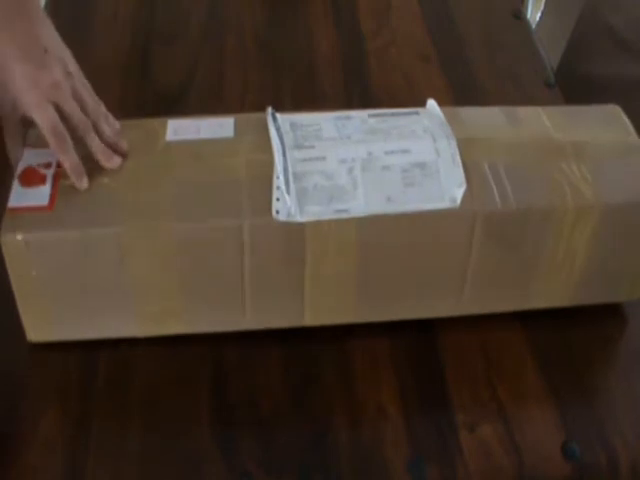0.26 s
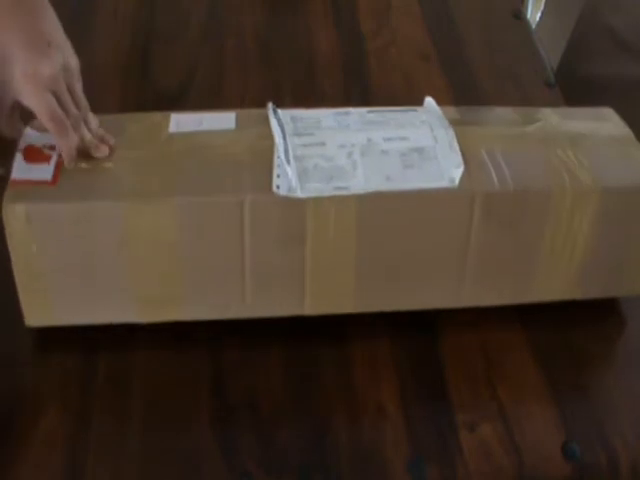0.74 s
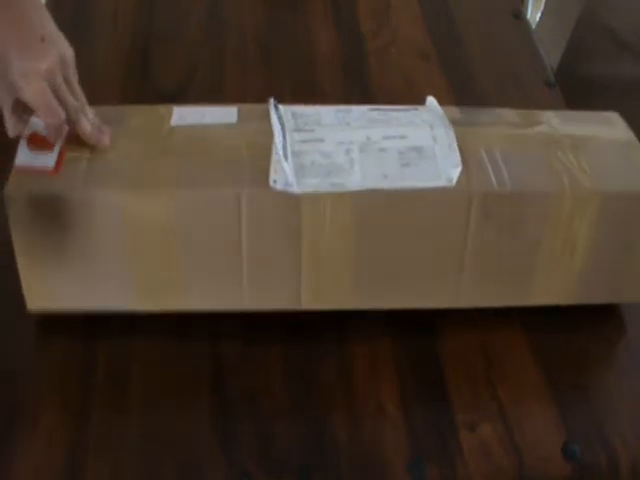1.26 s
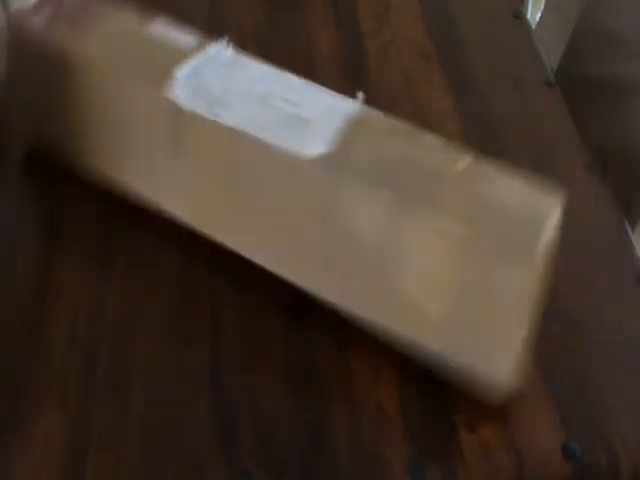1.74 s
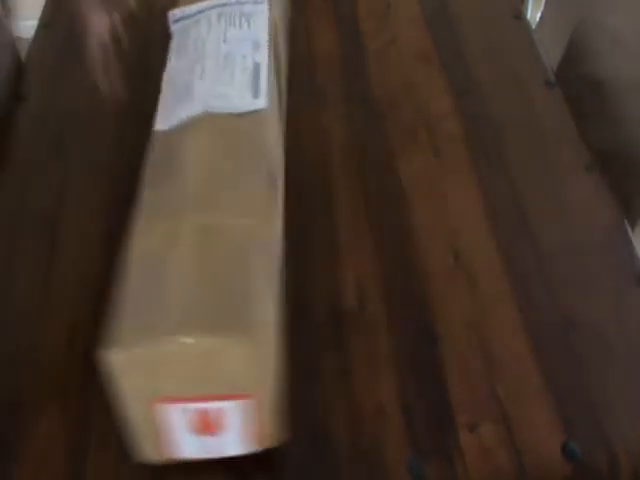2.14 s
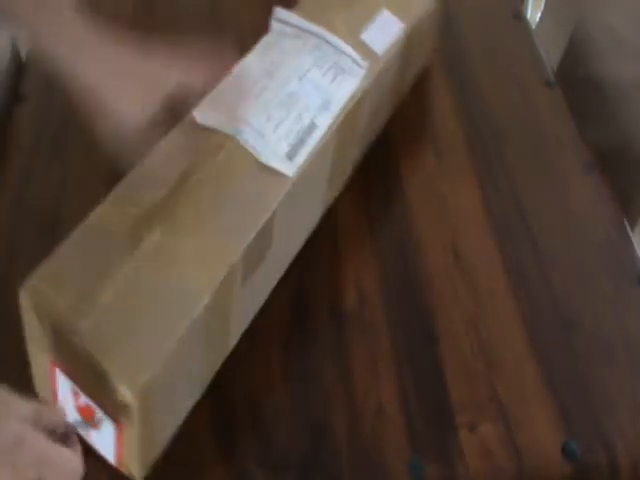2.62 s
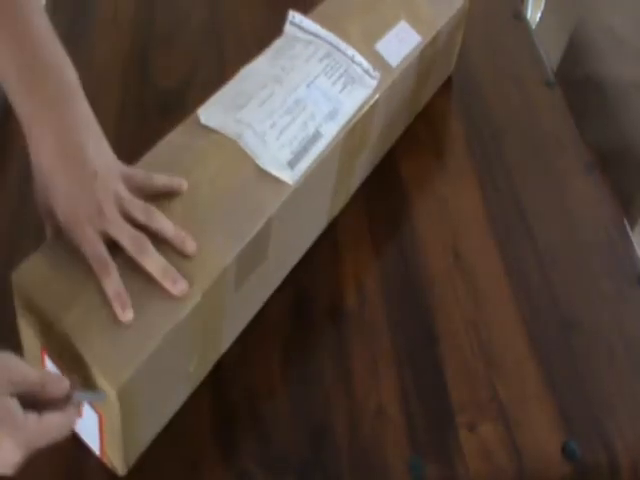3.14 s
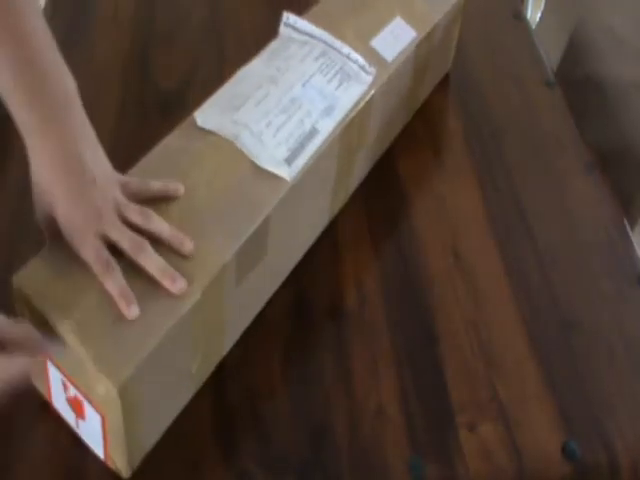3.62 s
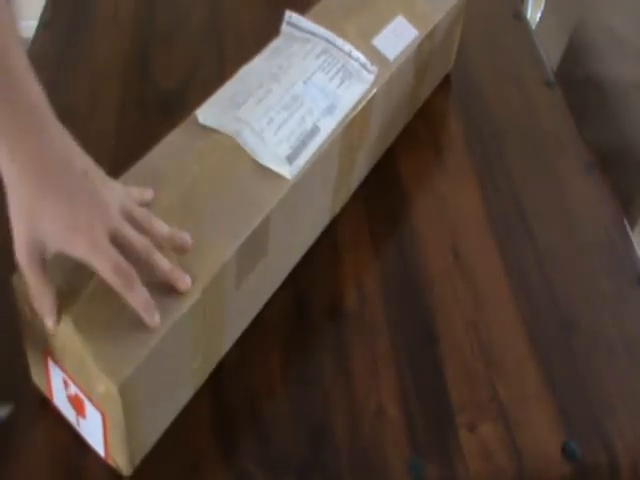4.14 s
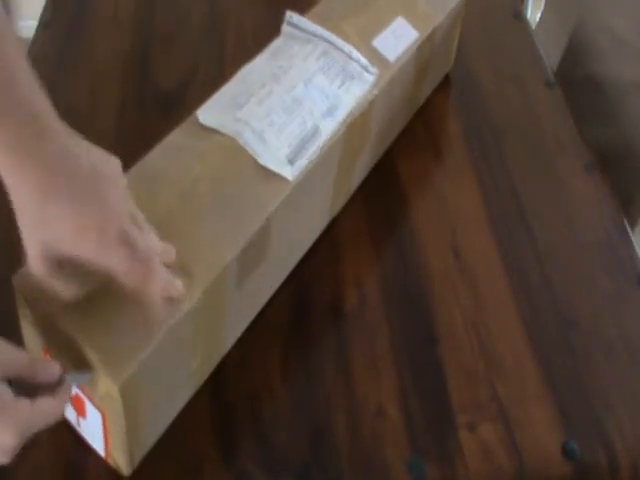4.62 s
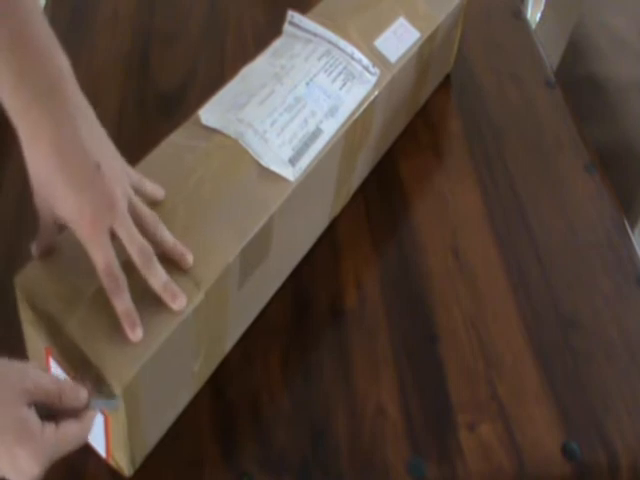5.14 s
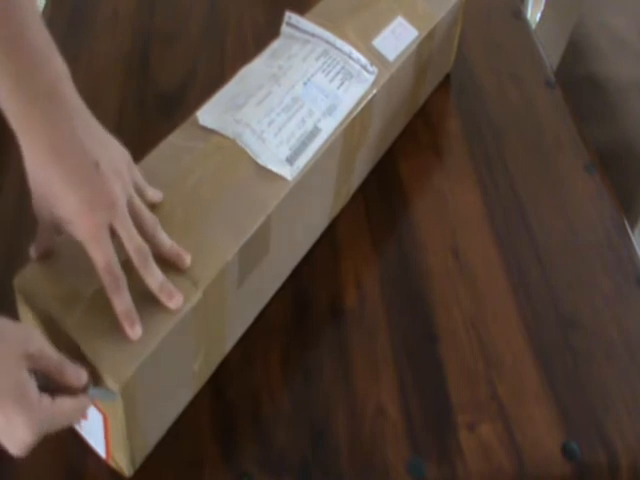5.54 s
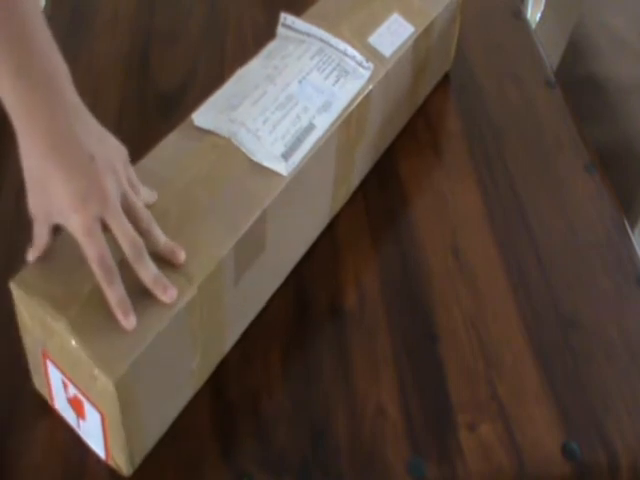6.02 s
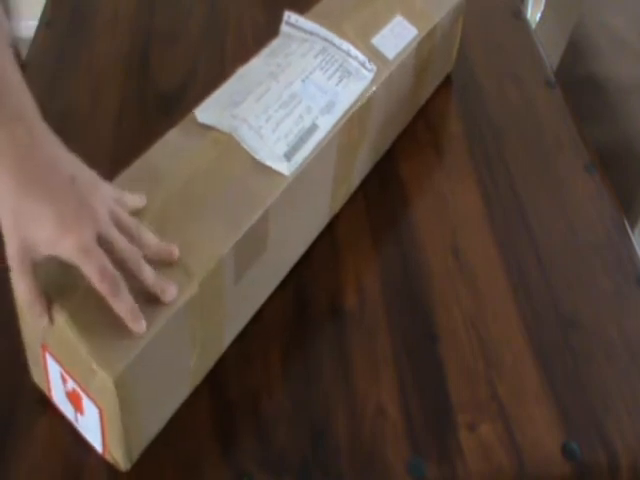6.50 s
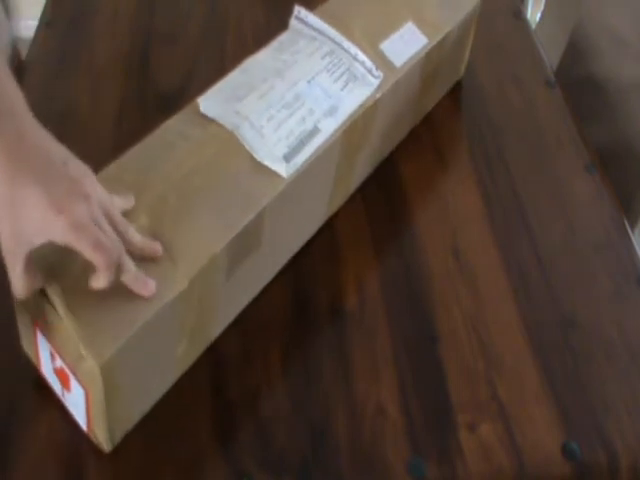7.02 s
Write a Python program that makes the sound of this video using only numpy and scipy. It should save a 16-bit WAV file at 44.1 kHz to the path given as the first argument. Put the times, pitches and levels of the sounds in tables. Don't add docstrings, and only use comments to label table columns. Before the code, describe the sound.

Close stereo sound from a small microphone in a small, hard, slightly echoing room, over steady low rumble, a distant engine, soft hiss and very faint whines. From 0 to 1 s fingers rub and pick at packing tape: a light initial thump, crisp bright crackles, a papery swipe near 0.8. At 1.03-1.2 s a blade rips tape loudly and briefly, with hollow cardboard booms. From 1.5 to 2.4 s the box slides and turns, with snaps and strong hollow knocks near 1.7 and 2.27; a loud short paper swipe lands at 2.43, a softer one at 2.7. Quiet rubbing and tiny ticks lead to a raspy double-surge rip at 3.53-3.8 s. Soft grip rustles follow, with sharp snaps near 4.3 and 4.4 and dull taps around 4.6. A third crackling rip runs 5.73-6.05, ending in a knock and thin buzz. Faint rustling continues until a firm hollow knock at 7.0 s, then fades.

```python
import sys
import numpy as np
from scipy import signal
from scipy.fft import rfft, irfft, next_fast_len
from scipy.io import wavfile
from scipy.ndimage import map_coordinates

SR = 44100
rng = np.random.default_rng(int(sys.argv[2]) if len(sys.argv) > 2 else 0)


def int16_out(signal):
    q = np.round(np.clip(np.atleast_2d(signal).T, -1, 1) * 32767)
    wavfile.write(sys.argv[1], SR, q.astype(np.int16))


def elevation(decibels):
    levels = np.asarray(decibels, float)
    return 10 ** (levels / 20)


N = 320166

# start_s, hiss_db, boom_db
STROKES = [
    [(1.02, -48, -44), (1.03, -28, -37), (1.05, -35, -34), (1.056, -22, -32), (1.102, -27.5, -22.5),
     (1.164, -24, -29), (1.21, -38, -57)],
    [(3.53, -55, -46), (3.542, -24.5, -39), (3.6, -26.5, -33), (3.692, -23.5, -24.5), (3.734, -21, -22.5),
     (3.8, -33, -45)],
    [(5.728, -79, -65), (5.736, -25, -29), (5.784, -35, -37), (5.854, -22, -29.5), (5.984, -28, -30),
     (6.008, -27, -33), (6.05, -46, -36)],
]
# hiss_hz, rasp_re_hiss_db, first_boom_hz, last_boom_hz, drone_re_boom_db
SEAMS = [
    (7300, -5.5, 290, 220, -12),
    (5360, -4, 660, 206, 0.5),
    (5000, -4, 790, 370, 6),
]
# pitch_hz, level_db (per Hz)
RIP_COLOUR = [(1470, -33), (2500, -3.5), (4780, -5), (5820, -6), (10600, -6), (15100, -13.5), (16100, -22),
              (16500, -38)]
# pitch_hz, level_db (per Hz)
RUB_COLOUR = [(1470, -31), (2500, -5), (3460, -8), (7430, -9), (10900, -8), (15200, -16), (16100, -17),
              (16500, -39)]
# pitch_hz, width_hz, level_db
RASP = [(830, 590, 13), (1046, 153, 13.5), (1420, 286, 8.5), (1875, 140, 9.5), (2190, 155, 8),
        (2500, 290, 2)]
# pitch_hz, level_db, t60_s
BOX = [(128, 0, 0.087), (135, -11, 0.058), (150, 0, 0.014), (193, -1.5, 0.29), (214.3, 0.5, 0.16),
       (248, 4.5, 0.054), (298, -1.5, 0.15), (339.5, -1.5, 0.13), (400, 4, 0.035), (460, 7, 0.071),
       (524, 10, 0.012), (602, 5.5, 0.039), (685, 9, 0.074), (812, 9.5, 0.043), (875, -62, 0.049),
       (1128, 17, 0.008)]
# peak_s, swell_s, fade_s, hiss_db, boom_db
RUBS = [(.02, 0.1, 0.25, -42.5, -41.5), (.32, 0.077, 0.27, -46.5, -45.5), (.48, 0.02, 0.35, -41.5, -45),
        (.74, 0.023, .03, -47, -62), (1.0, 0.063, 0.036, -43, -59), (1.22, .01, 0.12, -42, -50),
        (1.31, 0.2, 0.15, -44.5, -50), (1.53, 0.038, 0.96, -35, -51), (1.734, .15, 0.28, -31, -29),
        (1.85, 0.26, 0.4, -36, -54), (2.01, 0.089, 0.31, -38, -37.5), (2.22, 0.26, 0.04, -61.5, -46),
        (2.28, 0.026, 0.2, -36, -39), (2.55, 0.44, 0.05, -38.5, -42.5), (2.65, 0.15, 0.2, -39.5, -50),
        (2.91, 0.11, 0.034, -59, -48.5), (3.2, 0.26, 0.17, -80, -69), (3.5, 0.022, 0.0055, -44.5, -57)]
# peak_s, swell_s, fade_s, hiss_db, boom_db
GRIPS = [(3.92, 0.25, 0.15, -46.5, -48), (4.14, 0.027, 0.24, -52.5, -48), (4.3, 0.034, 0.12, -51, -41.5),
         (4.56, 0.057, 0.056, -39.5, -52), (4.69, 0.088, 0.072, -45.5, -45), (4.95, 0.12, 0.046, -52, -50),
         (6.17, 0.15, 0.14, -52.5, -48), (6.4, 0.08, 0.17, -54, -58), (6.585, 0.067, .09, -45, -40),
         (6.89, 0.035, 0.24, -50.5, -59), (4.81, .02, 0.074, -52, -65), (6.82, 0.19, 0.98, -58, -55),
         (7.014, 0.012, 0.048, -31.5, -47), (7.1, 0.12, 0.055, -69, -35)]
# peak_s, swell_s, fade_s, hiss_db, boom_db
SWIPES = [
    (.83, 0.064, 0.15, -34.5, -66),
    (2.433, 0.054, 0.036, -25, -40),
    (2.68, 0.041, 0.03, -38.5, -56),
]
# rasp_re_hiss_db, hiss_hz, boom_hz, drone_re_boom_db, lift_around_hiss_db
TAPE_SURFACE = (-4, 6100, 281, -3.5, 3.5)
CARD_SURFACE = (0.5, 4400, 341, -29, 5)
LABEL_SURFACE = (-11.5, 5010, 331, -21, 8)
# start_s, peak_db, lowest_hz, highest_hz
TAPE_SNAPS = [(0.0323, -31, 1600, 11500), (0.1058, -15, 4400, 14700), (0.1228, -21, 5500, 14700),
              (0.1598, -29, 5500, 14700), (0.2573, -26, 4400, 14700), (0.2652, -13, 4400, 14700),
              (0.2985, -26, 2700, 14700), (0.3113, -25, 3400, 11500), (0.352, -27, 5500, 14700),
              (0.36, -28, 7100, 14700), (0.3892, -23, 1300, 14700), (0.4073, -28, 7100, 14700),
              (0.4765, -12, 4000, 9000), (0.4959, -17, 4800, 9000), (0.5232, -15, 7100, 14700),
              (0.599, -30, 2100, 14700), (0.6137, -24, 5500, 11500), (0.7272, -38, 1600, 7100),
              (0.7393, -33, 2700, 11500), (0.758, -34, 7100, 11500), (0.7921, -15, 3000, 17000),
              (0.822, -24, 2700, 11500), (0.9769, -21, 3400, 14700), (1.0291, -20, 7100, 14700),
              (1.0336, -15, 4400, 14700), (1.0457, -16, 7100, 14700), (1.0568, -10, 800, 11500),
              (1.0895, -6, 4400, 14700), (1.0947, -11, 3400, 14700), (1.1656, -14, 800, 11500),
              (1.1709, -15, 3400, 14700), (1.1785, -16, 5500, 11500), (1.3294, -25, 5500, 11500),
              (1.6821, -17, 2700, 14700), (1.7411, -14, 1500, 9000), (1.8266, -13, 4400, 11500),
              (1.8443, -14, 5500, 11500), (2.9182, -33, 2100, 14700), (2.9642, -37, 2100, 14700),
              (3.1404, -35, 4400, 11500), (3.172, -34, 3400, 11500), (3.1927, -29, 4400, 9000),
              (3.4258, -29, 3400, 11500),
              (3.5006, -13, 5500, 11500), (3.5463, -8, 800, 9000), (3.5555, -14, 2500, 9000),
         (3.5802, -11, 4400, 11500), (3.764, -10, 1500, 14700), (3.771, -16, 1500, 7000),
         (3.9852, -30, 800, 1700), (4.139, -32, 1600, 4400), (4.2116, -36, 1300, 14700),
         (4.2885, -14, 2100, 14700), (4.4305, -11, 2300, 14700), (4.5463, -28, 800, 14700),
         (4.6231, -27, 4400, 11500), (4.6719, -30, 1600, 7100), (4.6996, -33, 800, 5600),
         (4.7935, -40, 2700, 11500), (4.8003, -35, 3400, 11500), (4.8176, -39, 5500, 11500),
         (4.9166, -33, 3400, 9000), (5.0256, -38, 9000, 17000), (5.5893, -36, 7100, 17000),
         (5.7045, -17, 4400, 14700), (5.736, -15, 800, 14700), (5.7709, -7, 4400, 14700),
         (5.792, -16, 2100, 14700), (5.8317, -12, 1300, 11500), (5.8416, -10, 7100, 11500),
         (5.8454, -7, 800, 11500), (6.012, -9, 1700, 11500), (6.0207, -15, 1900, 7100),
         (6.0325, -17, 2700, 7100), (6.1749, -33, 3400, 11500), (6.2398, -27, 5500, 14700),
         (6.3593, -32, 2700, 14700), (6.3932, -30, 800, 2700), (6.4451, -37, 2100, 11500),
         (6.4531, -39, 800, 7100), (6.5673, -32, 800, 7100), (6.5834, -26, 800, 9000),
         (6.646, -36, 800, 9000), (6.6776, -35, 800, 5600), (6.8096, -40, 800, 11500),
         (6.8759, -38, 2700, 11500), (7.0007, -29, 1000, 7100), (7.0138, -15, 700, 9000),
         (7.2476, -29, 7100, 14700)]
# start_s, peak_db, centre_hz, spread_octaves
KNOCKS = [(.032, -18, 190, 0.93), (0.977, -31, 370, 0.37), (1.055, -15, 485, 0.78), (1.09, -9.5, 205, 0.3),
          (1.164, -10, 255, 0.78), (1.96, -20.5, 135, 0.21), (1.567, -23, 177, 0.63),
          (1.704, -7.5, 322, 0.3), (1.74, -8.5, 304, 0.58), (2.2651, -6, 332, 0.32),
          (2.287, -13, 400, 0.37), (2.323, -16.5, 290, 0.4), (2.363, -27, 292, 0.26),
          (1.117, -13, 202, 0.22), (1.139, -11, 210, .2), (1.682, -23, 400, 0.38), (2.151, -33, 388, 0.12),
          (6.568, -34, 400, 0.77), (3.546, -23.5, 657, 0.22), (3.985, -30, 615, 0.42),
          (4.287, -30, 460, 0.095), (4.425, -29, 590, 0.29), (4.546, -24, 196, 0.7),
          (4.649, -22.5, 314, 1.1), (4.699, -23, 308, 0.96), (5.845, -24, 612, 0.065),
          (6.011, -12.5, 329, 0.82), (6.393, -32, 520, 0.7), (6.586, -20, 290, 0.35),
          (7.0132, -6.5, 343, 0.15), (4.562, -29, 696, .8), (3.585, -20, 604, .4), (5.735, -20, 690, 0.64),
          (4.301, -26.5, 442, 0.1), (1.76, -16.5, 260, 0.26), (7.0135, -19.5, 750, 0.35)]
# start_s, level_db (rms), pitch_hz, t60_s
TWANGS = [
    (5.74, -32, 2350, 0.12),
    (6.012, -34.5, 2450, 0.38),
    (6.021, -37, 3030, 0.23),
    (6.675, -43.5, 2980, 0.03),
    (6.675, -42, 4630, 0.028),
    (3.18, -48, 4950, 0.14),
]
# start_s, peak_db
BUMPS = [
    (0.03, -27),
    (1.564, -30),
    (1.702, -18.5),
    (2.264, -22),
    (3.699, -39),
    (4.545, -49),
    (4.655, -33),
]
# start_s, peak_db
THUDS = [
    (2.272, -21),
    (1.706, -31),
    (.04, -32),
]
# delay_s, level_db, smear_s
ECHOES = [(.008, -6.5, .0001), (.0172, -14, .0008), (.0198, -12, .001), (.036, -18, .001)]
# pitch_hz, t60_s
ROOM_T60 = [(200, 0.58), (1400, 0.48), (5000, 0.46), (14000, 0.33)]
# pitch_hz, likeness (0 to 1)
LIKENESS = [(60, 1.0), (130, 1), (290, 0.98), (640, 0.85), (1410, 0.31), (3100, 0.52), (6820, 0.59),
            (15000, 0.73)]
# pitch_hz, lead_rad
LEAD = [(30, 1.1), (150, 1.05), (430, .85), (1810, .4), (3700, .25), (8700, .3), (12500, .75), (16500, .5)]
# pitch_hz, level_db
BALANCE = [(60, -1.5), (240, 0), (950, -0.5), (3770, 0.5), (15000, 1.5)]
# pitch_hz, level_db
RUMBLE = [(15, -39), (33, -15), (45, 3), (53, -14), (85, -8), (172, -2.5), (202, -9.5), (339, -3.5),
          (368, -8.5), (952, -14.5), (1030, -16), (1880, -23.5), (2600, -23.5), (3410, -30.5),
          (15200, -38.5), (16500, -44)]
# pitch_hz, level_db (rms)
WHINE = [(2521, -66.5), (3150, -87), (15620, -73)]


def rms_one(x):
    return x / np.sqrt(np.mean(x ** 2) + 1e-20)


def at_hz(points, hz):
    table = np.array(points)
    return np.interp(np.log(hz), np.log(table[:, 0]), table[:, 1])


def near(hz, centre_hz, octaves):
    return np.exp(-.5 * (np.log2(hz / centre_hz) / octaves) ** 2)


def band(x, low_hz, high_hz):
    edges = [low_hz, min(high_hz, .45 * SR)]
    return signal.sosfilt(signal.butter(2, edges, "band", fs=SR, output="sos"), x)


def drift(rate_hz):
    r = np.exp(-32 * np.pi * rate_hz / SR)
    noise = rng.standard_normal(N // 16 + 2002)
    slow = signal.lfilter([1], [1, -2 * r, r * r], noise)[2000:]
    return np.interp(np.arange(N) / 16, np.arange(len(slow)), rms_one(slow))


def ring(x, hz, t60):
    r, w = elevation(-60 / (t60 * SR)), 2 * np.pi * hz / SR
    return signal.lfilter([0, np.sin(w)], [1, -2 * r * np.cos(w), r * r], x + 1e-18)


def blade():
    t, out = np.arange(N) / SR, np.zeros((8, N))
    out[5:] = 1
    for rows, (hiss_hz, rasp_db, first_hz, last_hz, drone_db) in zip(STROKES, SEAMS):
        s, speed_db, press_db = np.transpose(rows)
        done = np.clip((t - s[0]) / (s[-1] - s[0]), 0, 1)
        touch = np.clip(np.minimum(t - s[0], s[-1] - t) / .004 + 1, 0, 1)
        hiss_db = np.interp(t, s, speed_db)
        boom_db = np.interp(t, s, press_db)
        panel_db = boom_db + drone_db + 7.5 * (done - .5)
        boom_hz = first_hz * (last_hz / first_hz) ** done
        controls = [touch, hiss_db, rasp_db, boom_db, panel_db, hiss_hz, boom_hz, 4.0]
        for row, value in zip(out, controls):
            row[:] = np.where(touch > 0, value, row)
    return out


def friction(controls, colour, per_s, spread_db, lumpy_db):
    touch, hiss_db, rasp_db, boom_db, drone_db, hiss_hz, boom_hz, focus_db = controls
    sizes = elevation(spread_db * np.minimum(rng.exponential(1, N), 5)) * rng.choice([-1, 1], N)
    chance = per_s * elevation(lumpy_db * drift(60)) / SR
    slips = rms_one(sizes * (rng.random(N) < chance))

    edges = 2500 * 2 ** np.arange(0, 3, 1 / 3)
    hiss, power = 0, 0
    dealt = rng.integers(0, 2, N)
    for k, (low, high) in enumerate(zip(edges, edges[1:])):
        hz = np.sqrt(low * high)
        gain = elevation(at_hz(colour, hz) + focus_db * near(hz, hiss_hz, 0.72))
        flutter = elevation(2.04 * drift(57))
        hiss = hiss + gain * flutter * band(slips * (dealt == k % 2), low, high)
        power = power + gain ** 2 * (high - low)
    hiss = rms_one(hiss / np.sqrt(power))

    rasp = 0
    for k, (hz, width, db) in enumerate(RASP):
        rasp = rasp + elevation(db) * rms_one(ring(slips, hz, 0.93 / width)) * (-1) ** k
    rasp = rms_one(rasp)

    weights = [elevation(db) * (0.35 + near(hz, boom_hz, 0.39)) * (hz > 180) for hz, db, t60 in BOX]
    total = np.sqrt(sum(w ** 2 for w in weights))
    push, boom = touch * slips, 0
    for w, (hz, db, t60) in zip(weights, BOX):
        weight = elevation(boom_db) * w / total + elevation(drone_db + db - 6.5) * (hz < 180)
        even_power = np.sqrt(4 * np.log(1000) / (t60 * SR))
        boom = boom + ring(weight * push, hz, t60) * even_power
    boom = band(band(boom, 136, 1000), 101, 5800)
    return touch * elevation(hiss_db) * (hiss + elevation(rasp_db) * rasp) + boom


def swells(rows):
    t, power = np.arange(0, N + 32, 32) / SR, 1e-12
    for s, swell, fade, hiss_db, boom_db in rows:
        rise, fall = (s - t) / max(swell, .002), (t - s) / max(fade, .002)
        slope_db = -12 * np.maximum(rise, fall)
        power = power + elevation(2 * (slope_db + np.array([[hiss_db], [boom_db]])))
    return power


def hands():
    power = np.array([swells(RUBS), swells(GRIPS), swells(SWIPES)])
    hiss_db, boom_db = 10 * np.log10(power.sum(0))
    share = power[:, 0] / power[:, 0].sum(0)
    surfaces = np.transpose([TAPE_SURFACE, CARD_SURFACE, LABEL_SURFACE])
    rasp_db, hiss_hz, boom_hz, drone_db, focus_db = surfaces @ share
    touch = np.ones_like(hiss_db)
    coarse = [touch, hiss_db, rasp_db, boom_db, boom_db + drone_db, hiss_hz, boom_hz, focus_db]
    return [np.interp(np.arange(N) / 32, np.arange(len(c)), c) for c in coarse]


def snaps():
    out, luck = np.zeros(N), rng.standard_normal((128, 80))
    fade = .36 * np.exp(-np.arange(80) / 20.0)
    for (s, db, low_hz, high_hz), noise in zip(TAPE_SNAPS, luck):
        burst = np.r_[1, noise * fade, np.zeros(175)]
        lower_half = band(burst, low_hz, np.sqrt(low_hz * high_hz))
        click = band(burst, low_hz, high_hz) + .8 * lower_half
        at = round(s * SR) - np.abs(click).argmax()
        click = elevation(db + 2) * click / np.abs(signal.hilbert(click)).max()
        out[at:at + 256] += click[:N - at]
    return out


def knocks():
    s, peak_db, centre_hz, octaves = np.transpose(KNOCKS)
    at, out, t = np.round(s * SR).astype(int), np.zeros(N), np.arange(SR // 5) / SR
    shape = (len(s), len(BOX))
    luck = rng.choice([-1, 1], shape) * elevation(4.6 * rng.standard_normal(shape) - 3)
    for k, (hz, db, t60) in enumerate(BOX):
        clicks = np.zeros(N)
        share = 0.15 + near(hz, centre_hz, np.clip(octaves, .1, 1.5))
        share = share / np.sqrt(octaves / 0.29)
        signed = np.where(share > .7, -np.abs(luck[:, k]), luck[:, k])
        clicks[at] = elevation(peak_db + db - 13) * share * signed
        out += ring(clicks, hz, t60)
    for i, db, hz, wide in zip(at, peak_db, centre_hz, octaves):
        decay_db = 60 * t * hz * wide / 4.8
        out[i:i + len(t)] -= elevation(db - 5.5 - decay_db) * np.sin(2 * np.pi * hz * t)
    return band(band(out, 85, 2700), 87, 6000)


def twangs():
    out, t = np.zeros(N), np.arange(SR // 2) / SR
    for s, db, hz, t60 in TWANGS:
        buzz = rms_one(band(rng.standard_normal(len(t)), hz / 1.13, hz * 1.06))
        out[round(s * SR):][:len(t)] += elevation(db - 60 * t / t60) * buzz
    return out


def bumps():
    table_hz, table_t60_s = 86.5, 0.044
    clicks = np.zeros(N)
    for s, db in BUMPS:
        clicks[round(s * SR)] = elevation(db)
    return band(ring(clicks, table_hz, table_t60_s), 60, 220)


def thuds():
    t = np.arange(N) / SR
    push = sum(elevation(db) * np.exp(-((t - s) / .005) ** 2) for s, db in THUDS)
    return push * np.array([[.4], [1]])


def room(x):
    tail_db = -8
    t = np.arange(SR // 2) / SR
    early = np.zeros((2, len(t)))
    for delay, db, smear_s in ECHOES:
        noise = rng.standard_normal(200) + 0.16 * rng.standard_normal((2, 200))
        smear = noise * np.exp(-t[:200] / smear_s)
        smear[:, 0] = 2
        early[:, round(delay * SR):][:, :200] += elevation(db) * smear / np.sqrt(np.sum(smear ** 2) / 2)

    tail, edges = 0, 60 * 2 ** np.arange(9.)
    for low, high in zip(edges, edges[1:]):
        hz = np.sqrt(low * high)
        mid, side = band(rng.standard_normal((2, len(t))), low, high)
        alike = np.clip(at_hz(LIKENESS, hz), 0, .97) ** 2
        both = np.sqrt(1 + alike) * mid + np.sqrt(1 - alike) * side * [[1], [-1]]
        tail = tail + both * elevation(-60 * t / at_hz(ROOM_T60, hz))
    tail = tail * np.clip(t / 0.0075, 0, 1) ** 2
    response = early + elevation(tail_db) * tail / np.sqrt(np.sum(tail ** 2) / 2)

    moving = map_coordinates(x, [np.arange(N) - 7.04 * drift(8.86)], order=3)
    return x + signal.fftconvolve(moving[None], response, axes=1)[:, :N]


def ports(x):
    size = next_fast_len(N + 4096)
    hz = np.arange(size // 2 + 1) * SR / size + 1
    turn = np.exp(.5j * at_hz(LEAD, hz)) * elevation(at_hz(BALANCE, hz) / 2)
    return irfft(rfft(x, size) * np.array([turn, 1 / turn]), size)[:, :N]


def rumble():
    rumble_db, throb_hz, throb_db = -45, 48, -54
    out, edges = 0, 25 * 2 ** np.arange(0, 9.5, 1 / 3)
    white = rng.standard_normal((2, 2, N + 8000))
    for k, (low, high) in enumerate(zip(edges, edges[1:])):
        mid, side = band(white[k % 2], low, high)[:, 8000:]
        hz = np.sqrt(low * high)
        alike = np.clip(at_hz(LIKENESS, hz), 0, 1)
        both = np.sqrt(1 + alike) * mid + np.sqrt(1 - alike) * side * [[1], [-1]]
        out = out + elevation(at_hz(RUMBLE, hz)) * both
    t = np.arange(N) / SR
    whine = sum(elevation(db + 1.0) * np.sin(2 * np.pi * hz * t) for hz, db in WHINE)
    engine = rms_one(band(white[0, 0], throb_hz / 0.97, throb_hz * 1.245)[8000:])
    throb = elevation(throb_db + 1.6 * drift(6.6)) * engine
    return elevation(rumble_db) * rms_one(out) + throb + whine


def scene():
    rips = friction(blade(), RIP_COLOUR, per_s=6000, spread_db=4.2, lumpy_db=3.5)
    rubs = friction(hands(), RUB_COLOUR, per_s=12000, spread_db=4.0, lumpy_db=2.5)
    table = elevation(-4.0) * (rips + rubs) + snaps() + knocks() + twangs() + bumps()
    return ports(room(table)) + rumble() + thuds()


def band_limit(x):
    return signal.sosfilt(signal.butter(12, 16970, fs=SR, output="sos"), x)


def record(dry):
    top_cut = signal.cheby2(14, 26, 15950, fs=SR, output="sos")
    bass_cut = signal.butter(2, 40, "high", fs=SR, output="sos")
    mix = signal.sosfilt(bass_cut, signal.sosfilt(top_cut, dry))
    return band_limit(mix)


dry = scene()
out = record(dry)
int16_out(out)
```